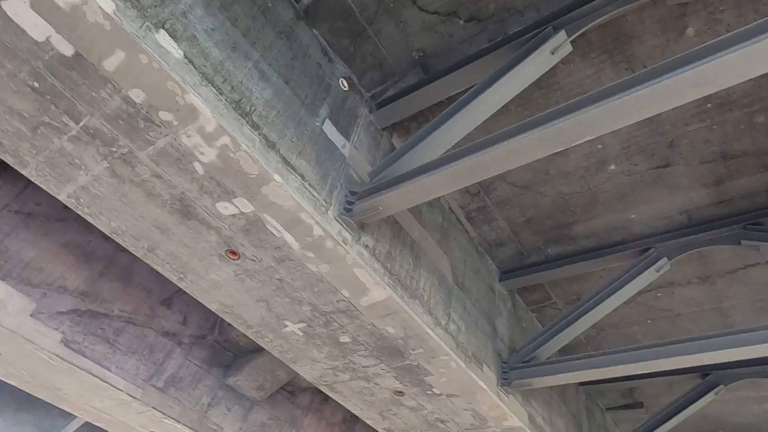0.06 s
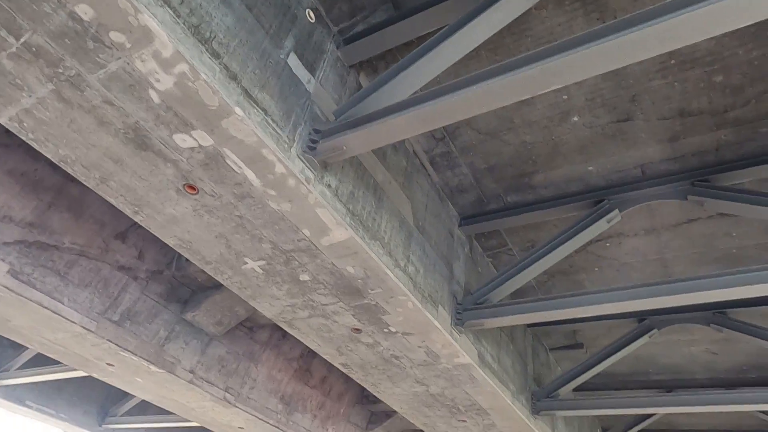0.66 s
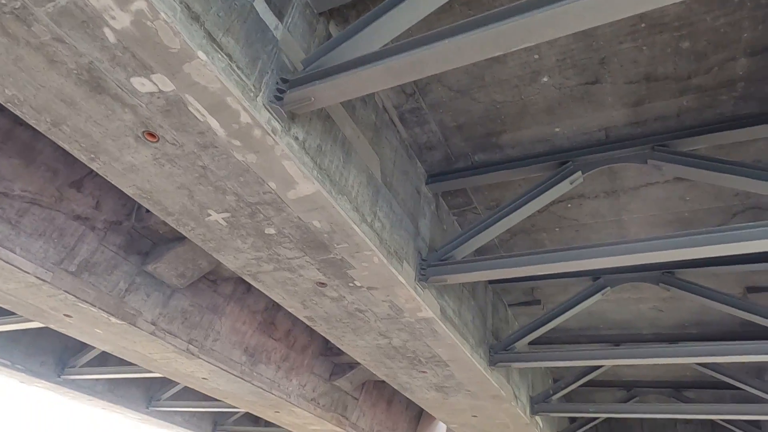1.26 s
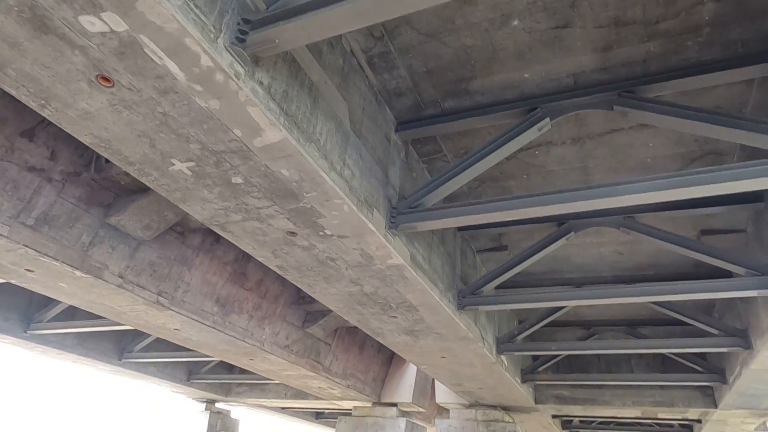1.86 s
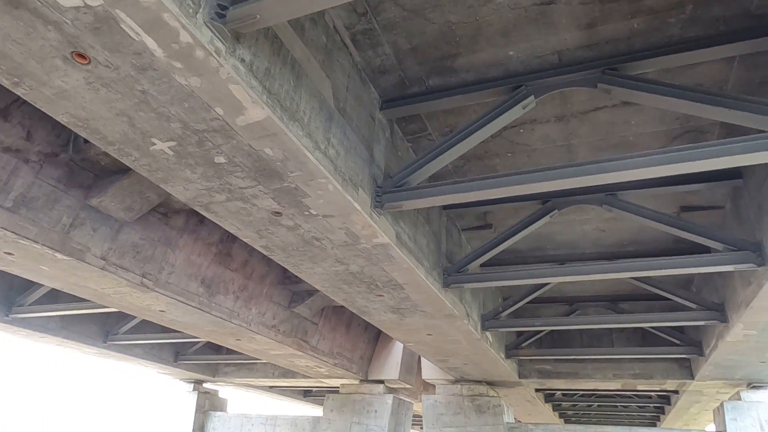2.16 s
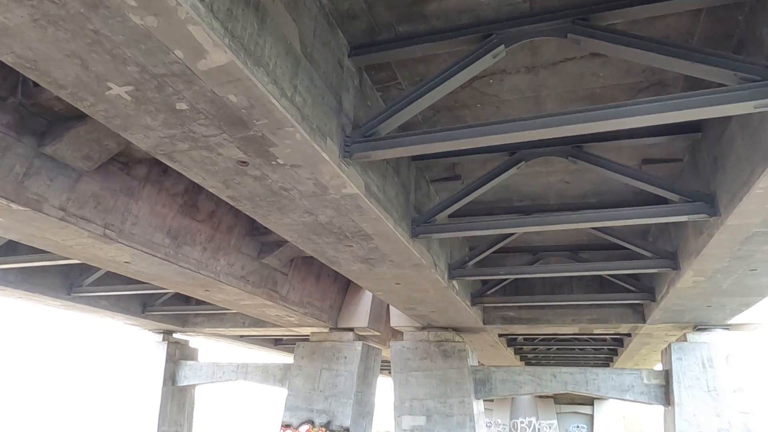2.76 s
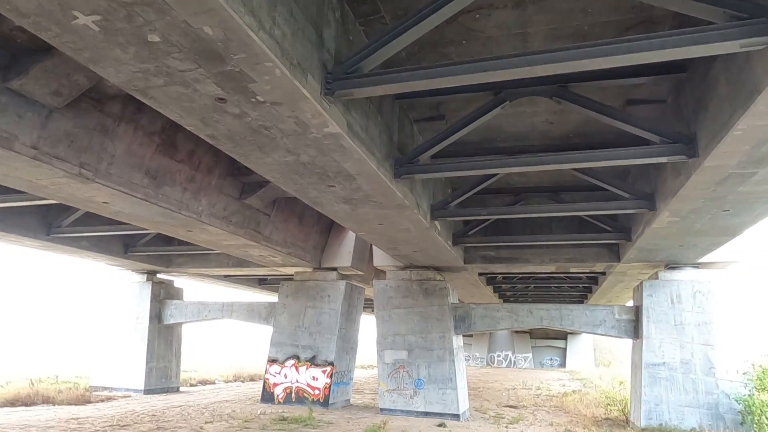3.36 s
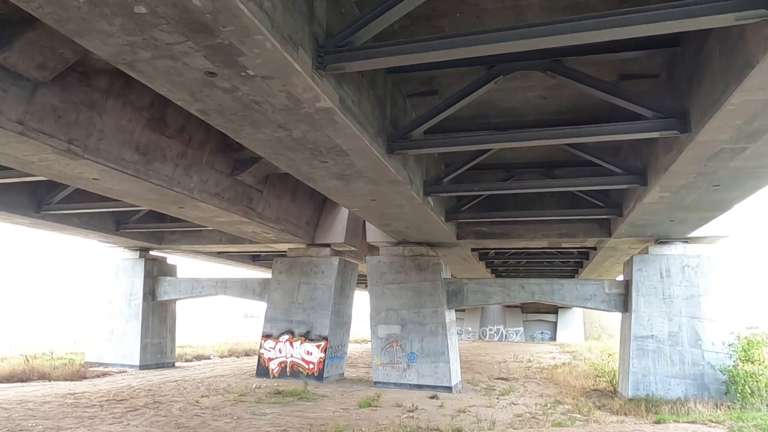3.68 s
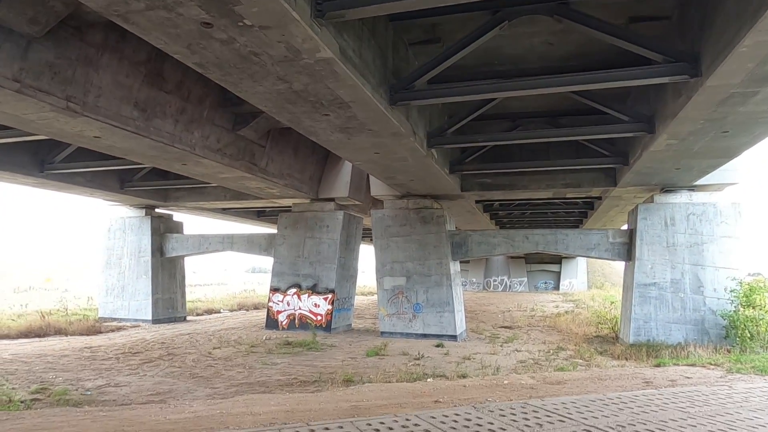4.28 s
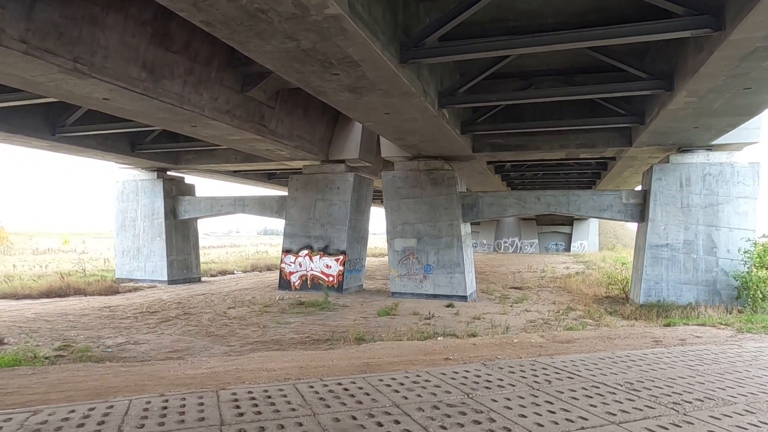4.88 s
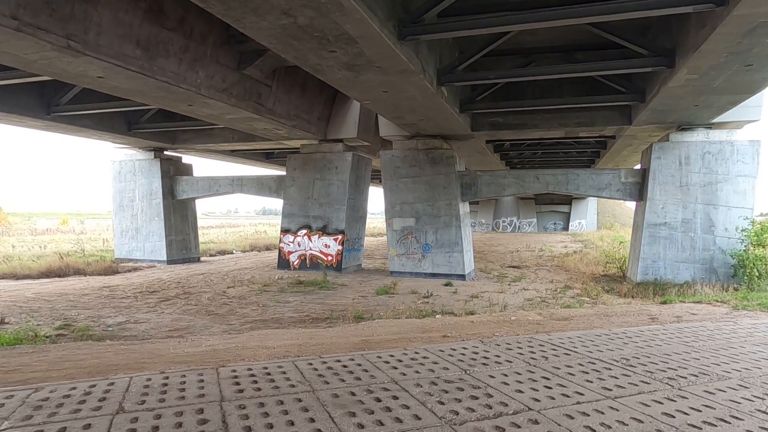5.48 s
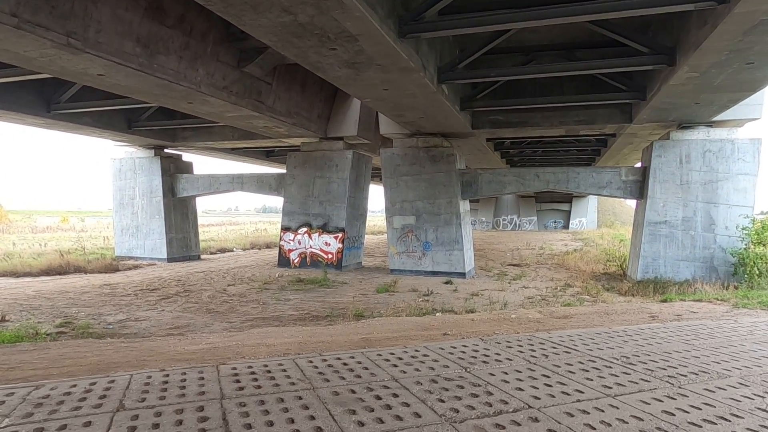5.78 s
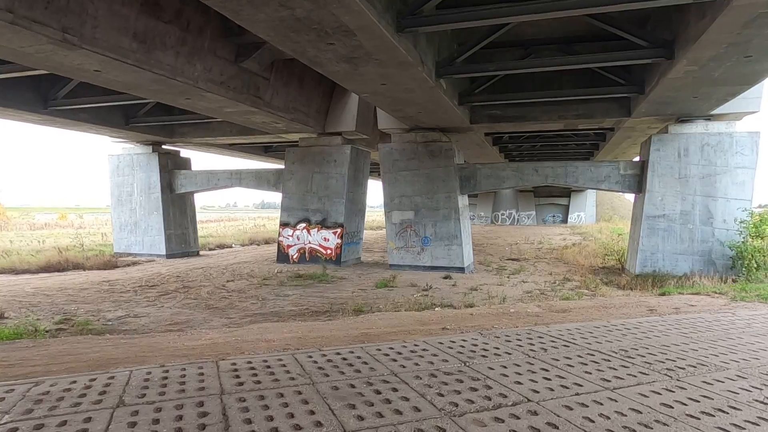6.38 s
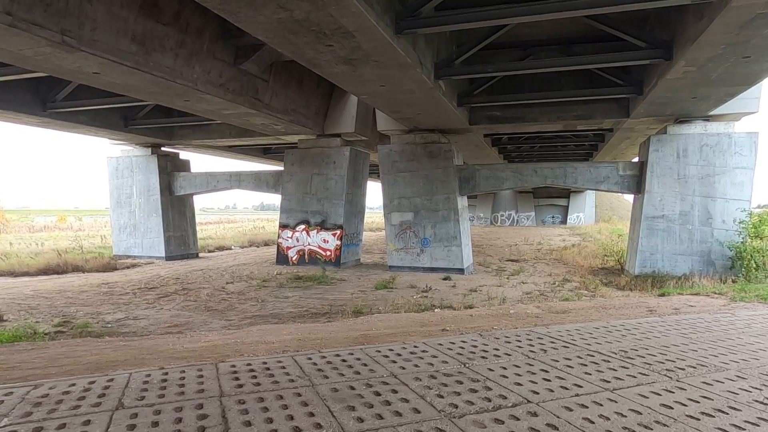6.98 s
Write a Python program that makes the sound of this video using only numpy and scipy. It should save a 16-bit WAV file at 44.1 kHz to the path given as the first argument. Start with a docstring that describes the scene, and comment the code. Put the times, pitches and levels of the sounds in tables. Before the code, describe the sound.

A low, continuous traffic rumble comes through a road bridge to a microphone at ground level below. An engine hum drops a little as it passes, then the tyre roar of a heavy vehicle starts to build. Two runs of deep, ringing thumps follow as axles cross the joints, with low drones between them. The tyres hum and keep getting louder and brighter, topped by faint hiss and tiny ticks.

```python
"""Under a concrete and steel road bridge. Far traffic hushes; wheels keep the deck ringing.
An engine tone sinks by Doppler shift and low drones swell out of the rumble. A heavy vehicle nears:
axles thump over joints, the span booms, the treads hum, the tyre roar grows louder and brighter.
A thin hiss surges above it, with a few faint high ticks."""
import sys
import numpy as np
from scipy import signal
from scipy.fft import rfft, irfft, next_fast_len
from scipy.io import wavfile
from scipy.ndimage import uniform_filter1d

SR = 44100
rng = np.random.default_rng(int(sys.argv[2]) if len(sys.argv) > 2 else 0)


def unload_audio(sound):
    """Save the sound as a 16-bit wav file, at the path given as the first command line argument."""
    columns = np.transpose(np.atleast_2d(sound))
    # keep every value between -1 and 1, then stretch to whole-number steps
    steps = np.round(np.clip(columns, -1, 1) * 32767)
    wavfile.write(sys.argv[1], SR, steps.astype(np.int16))


N = 314874
TIME = np.arange(N) / SR
FREQS = np.fft.rfftfreq(N, 1 / SR)
ON_SPAN_S = 4.02  # vehicle rolls onto this span

# bending of the whole span: f/Hz, width/Hz, level/dB
SPAN_MODES = [(22.86, 1.6, 2), (36.7, 9.8, 0.5), (45, 11, -5)]
# slab between the girders: f/Hz, width/Hz, level/dB
SLAB_MODES = [(56, 2.6, -4), (63.5, 5.5, 2), (72.6, 8.1, -1), (91.7, 6.2, -2)]
# girders: f/Hz, width/Hz, level/dB
GIRDER_MODES = [(107.5, 9.5, -6.5), (119.8, 3.5, -1.5), (128.2, 5, 2.5), (146.9, 6.2, -1), (160.3, 6, -3)]


def gain_of(db):
    """Decibels to amplitude."""
    return 10 ** (np.asarray(db) / 20)


def unit_rms(x):
    """Scale to rms 1."""
    return x / np.sqrt(np.mean(x ** 2) + 1e-20)


def spectrum_db(points, hz):
    """Spectrum table interpolated over log frequency."""
    f, db = np.transpose(points)
    return np.interp(np.log(hz + 1), np.log(f + 1), db)


def add(mix, start_s, sound):
    """Mix a sound in at start_s."""
    part = mix[round(start_s * SR):][:len(sound)]
    part += sound[:len(part)]


def envelope(start_s, length_s, rise_s, fade_s):
    """Linear rise; exponential fade from length_s after the start."""
    age = TIME - start_s
    return np.clip(age / rise_s, 0, 1) * np.exp(-np.maximum(age - length_s, 0) / fade_s)


def ringing(modes):
    """Noise in steep-skirted resonances, rms 1."""
    size = next_fast_len(N)
    freqs = np.fft.rfftfreq(size, 1 / SR)
    power = sum(gain_of(db) ** 2 / (1 + ((freqs - hz) / width) ** 2) ** 2 for hz, width, db in modes)
    return unit_rms(irfft(rfft(rng.standard_normal(size)) * np.sqrt(power), size)[:N])


def steadied(x, share, samples):
    """Even out a share of the slow swells, as many wheels at once do; rms 1."""
    power = abs(uniform_filter1d(x ** 2, samples)) + 1e-9
    return unit_rms(x / uniform_filter1d(power, samples // 2) ** (share / 2))


def rush(spectrum, patchy_db, ripple_db, dull_db=0):
    """Tyre noise, rms 1: drifting patches, ripple from reflections, distance loss of dull_db at 4 kHz."""
    frames, hz = N // 256 + 5, np.fft.rfftfreq(1024, 1 / SR)
    real, imag, patches = rng.standard_normal((3, frames, len(hz)))
    patches = unit_rms(uniform_filter1d(uniform_filter1d(patches, size=16, axis=0), size=6, axis=1))
    frame_dull_db = np.interp(np.arange(frames) * 256 / SR, TIME, np.broadcast_to(dull_db, N))
    loss_shape = np.log1p((hz / 900) ** 2) / np.log1p((4000 / 900) ** 2)
    field_db = spectrum_db(spectrum, hz) + patchy_db * patches - frame_dull_db[:, None] * loss_shape
    noise = signal.istft(((real + 1j * imag) * gain_of(field_db)).T, nperseg=1024, noverlap=768)[1][:N]
    ripple = unit_rms(uniform_filter1d(rng.standard_normal(len(FREQS)), size=100))
    return unit_rms(irfft(rfft(noise) * gain_of(ripple_db * ripple), N))


def far_traffic():
    """Even hush of the road beyond the span."""
    # far traffic and still air: f/Hz, relative density/dB
    spectrum = [(100, -28.5), (250, 0.5), (330, -2.5), (430, -3), (600, -0.5), (750, -1.5), (900, -2),
                (1070, -1.5), (1400, -5.5), (2000, -13), (2700, -22.5), (3500, -32), (4300, -38.5),
                (6000, -41), (8800, -46.5)]
    return gain_of(-48) * rush(spectrum, patchy_db=0.97, ripple_db=1.0)


def jolting(heaves, hollow, fade_s):
    """Envelope of wheels jolting over rough deck, weighted for span (heaves) or bays (hollow)."""
    # rough stretches: t/s, length/s, level/dB, span offset/dB, bay offset/dB
    jolts = [(0.035, 1.07, -21.5, 14.5, -6), (0.623, 0.22, -10, -9.5, -11), (1.978, 0.23, -11, 0, -10),
             (2.937, 0.27, -10.5, 4.5, -5), (3.985, 0.09, -9, 3, -2), (4.16, 0.43, -7, 4, 7.5),
             (4.418, 0.44, -7.5, 4, 7), (5.09, 0.16, -10, 9, 0), (6.18, 1.1, -4.5, -3, 5.5)]
    power = np.zeros(N)
    for start_s, length_s, db, span_db, bay_db in jolts:
        strength = gain_of(db + heaves * span_db + hollow * bay_db)
        power += (strength * envelope(start_s, length_s, rise_s=0.035, fade_s=fade_s)) ** 2
    return np.sqrt(power)


def shaking(idle_db, load_db, jolt_db, fade_s, build_db_per_s, heaves=False, hollow=False):
    """Drive on one bridge part: power sum of other traffic, vehicle load and jolts."""
    roll_on_s, joint_loss_db = 1, 3.5
    before_s = np.maximum(ON_SPAN_S - TIME, 0)
    off_span = 1 - np.clip((TIME - ON_SPAN_S) / roll_on_s, 0, 1)
    load = gain_of(load_db - build_db_per_s * before_s - joint_loss_db * off_span)
    jolts = gain_of(jolt_db) * jolting(heaves, hollow, fade_s)
    return np.sqrt(gain_of(idle_db) ** 2 + load ** 2 + jolts ** 2)


def deck():
    """Rolling wheels keep span, slab, girders, bays and braces ringing."""
    # air in the bays between girders: f/Hz, width/Hz, level/dB
    bay_modes = [(180, 11, 2), (207.8, 8.3, 2), (230.2, 7.7, -1), (248.6, 10, -5), (278.3, 29, -10.5),
                 (334, 45, -14)]
    # steel cross braces: f/Hz, width/Hz, level/dB
    brace_modes = [(268.3, 4.7, -0.5), (358.5, 5.2, -4)]
    span = shaking(idle_db=-46, load_db=-38.5, jolt_db=-36, fade_s=0.21, build_db_per_s=17.5, heaves=True)
    slab = shaking(idle_db=-44.5, load_db=-43, jolt_db=-34, fade_s=0.079, build_db_per_s=4.5)
    girders = shaking(idle_db=-46.5, load_db=-36.5, jolt_db=-34, fade_s=0.055, build_db_per_s=9)
    bays = shaking(idle_db=-55, load_db=-38, jolt_db=-40.5, fade_s=0.054, build_db_per_s=5, hollow=True)
    braces = shaking(idle_db=-62, load_db=-52.5, jolt_db=-61, fade_s=0.15, build_db_per_s=6)
    return (span * steadied(ringing(SPAN_MODES), share=0.79, samples=8000)
            + slab * steadied(ringing(SLAB_MODES), share=0.57, samples=6000)
            + girders * steadied(ringing(GIRDER_MODES), share=0.62, samples=5000)
            + bays * steadied(ringing(bay_modes), share=0.11, samples=5000)
            + braces * steadied(ringing(brace_modes), share=0.2, samples=16000))


def engine(firing_hz=68.03, doppler_share=0.04, pass_s=2.95, glide_s=0.36):
    """Firing tone: Doppler fall on passing, wavering as its paths through the deck shift."""
    # swells and dips: t/s, half width/s, gain/dB
    swells = [(2.03, 0.29, 5), (2.48, 0.084, -10), (3.68, 0.18, 6.5)]
    recede_db_per_s, drift_hz, waver_depth, stray_rad = 0.2, 6, 0.33, 0.4
    hz = firing_hz * (1 - doppler_share * np.tanh((TIME - pass_s) / glide_s))
    db = -43.5 - recede_db_per_s * np.maximum(TIME - pass_s, 0)
    db += sum(swell_db * np.exp(-((TIME - at_s) / width_s) ** 2) for at_s, width_s, swell_db in swells)
    waver, stray = (ringing([(0.0056, drift_hz, 0)]) for _ in range(2))
    tone = np.sin(2 * np.pi * np.cumsum(hz) / SR + stray_rad * stray)
    return gain_of(db) * unit_rms((1 + waver_depth * waver) * tone)


def crackle(spectrum, rate_per_s=500, spread_db=4.5):
    """Sparse uneven grains coloured by a spectrum, rms 1."""
    grains = (rng.random(N) < rate_per_s / SR) * rng.choice([-1, 1], N)
    sizes = gain_of(spread_db * np.minimum(rng.exponential(1, N), 4))
    return unit_rms(irfft(rfft(grains * sizes) * gain_of(spectrum_db(spectrum, FREQS)), N))


def tyres(earshot_s=2.44, rise_s=0.15, near_s=7.094, swell_db_per_s=3.5, brighten_db_per_s=4):
    """Roar swells and brightens on approach, flaring at the span; grainy hiss surges above it."""
    # tyre roar: f/Hz, relative density/dB
    roar_spectrum = [(150, -10), (310, -9), (410, -5), (500, 0.5), (575, 1), (700, -3.5), (930, -5),
                     (1200, -9), (2000, -19.3), (3000, -28.5), (4500, -38.5), (6000, -50), (7500, -57),
                     (8600, -57)]
    # thin hiss: f/Hz, relative density/dB
    hiss_spectrum = [(1200, -13.5), (2500, 6.5), (3600, 1.5), (5000, -6), (6300, -12), (8800, -18.5)]
    # hiss surges: t/s, length/s, level/dB
    surges = [(1.6, 0.28, -77), (2.948, 0.16, -76.5), (3.313, 0.38, -67.5), (3.877, 0.33, -72.5),
              (4.692, 0.33, -69), (5.218, 0.24, -66), (6.205, .17, -66)]
    to_go_s = near_s - TIME
    level = gain_of(-35 - swell_db_per_s * to_go_s) * np.clip((TIME - earshot_s) / rise_s, 0, 1)
    level *= 1 + 0.25 * envelope(ON_SPAN_S, length_s=0.078, rise_s=0.078, fade_s=0.23)
    roar = level * rush(roar_spectrum, patchy_db=0, ripple_db=0.24, dull_db=brighten_db_per_s * to_go_s - 4)
    surge_power = sum((gain_of(db) * envelope(start_s, length_s, rise_s=0.13, fade_s=0.19)) ** 2
                      for start_s, length_s, db in surges)
    hiss_level = np.sqrt(surge_power + (gain_of(-40) * level) ** 2)
    hiss = rush(hiss_spectrum, patchy_db=1.0, ripple_db=2.8) + gain_of(-6) * crackle(hiss_spectrum)
    return roar + hiss_level * hiss


def drones(stray_rad=0.25, drift_hz=5):
    """Low, slightly unsteady notes swell out of the rumble and sink back."""
    # deck drones: t/s, length/s, f/Hz, level/dB
    notes = [(2.036, 0.21, 119.7, -39.5), (2.156, 0.19, 209, -46.5), (2.497, 0.6, 159, -49),
             (2.7, 1, 120.8, -46), (2.92, 0.38, 227.2, -50.5), (3.345, 0.36, 209.6, -44.5),
             (4.45, 0.32, 182.4, -38), (4.803, 0.14, 214.8, -41.5), (4.92, 0.24, 125.4, -38.5),
             (5.205, 0.32, 155.3, -41), (5.525, 0.29, 146.2, -37.5), (5.778, 0.66, 66.1, -40)]
    stray = stray_rad * ringing([(0.009, drift_hz, 0)])
    out = np.zeros(N)
    for start_s, length_s, hz, db in notes:
        tone = unit_rms(np.sin(2 * np.pi * (hz * TIME + rng.random()) + stray))
        out += gain_of(db) * envelope(start_s, length_s, rise_s=0.12, fade_s=0.12) * tone
    return out


def struck(modes, rise_s, damping_hz, scatter_turns=0.3):
    """A blow starts modes nearly in phase; each decays by its width plus tyre damping."""
    hz, width_hz, db = np.transpose(modes)[:, :, None]
    age = TIME[:SR]
    turns = hz * age + scatter_turns * rng.random(hz.shape)
    decay = np.exp(-np.pi * (width_hz + damping_hz) * age)
    ring = (gain_of(db) * decay * np.sin(2 * np.pi * turns)).sum(0)
    ring *= (1 - np.exp(-age / rise_s)) ** 2
    return ring / np.sqrt(np.mean(ring[:SR // 10] ** 2))  # rms 1 over the first 0.1 s


def joints(trim_db=-2):
    """Each axle drops on a joint: girders knock, slab thuds, span heaves."""
    # axle blows, relative levels: t/s, knock/dB, thud/dB, heave/dB
    axles = [(3.98, -32.5, -39.5, -36.5), (4.012, -37, -34.5, -36), (4.148, -28, -31, -28),
             (4.185, -35, -40, -39), (4.221, -30.5, -33.5, -27), (4.291, -32, -29, -35.5),
             (4.389, -31, -36, -49), (4.434, -43, -28, -38), (4.478, -30, -40, -40),
             (4.573, -41, -43, -33.5), (4.657, -40, -36, -27.5), (4.745, -28.5, -32, -39),
             (4.78, -44, -29, -31.5), (4.861, -41, -37, -32), (4.916, -46, -35, -36),
             (6.177, -29.5, -29.5, -30), (6.226, -40, -40, -46), (6.313, -31, -34, -24.5),
             (6.457, -27, -39, -38), (6.565, -31, -41, -29), (6.638, -27.5, -33, -39),
             (6.776, -28.5, -46, -38), (6.843, -30.5, -29, -48), (6.887, -31, -30, -46),
             (6.935, -30, -43, -46), (6.988, -33, -44, -43), (7.058, -36.5, -48, -43)]
    out = np.zeros(N)
    for start_s, knock_db, thud_db, heave_db in axles:
        add(out, start_s, gain_of(knock_db) * struck(GIRDER_MODES, rise_s=0.014, damping_hz=8.8))
        add(out, start_s, gain_of(thud_db) * struck(SLAB_MODES, rise_s=0.024, damping_hz=4.2))
        add(out, start_s, gain_of(heave_db) * struck(SPAN_MODES, rise_s=0.026, damping_hz=6))
    return gain_of(trim_db) * out


def ticks(tick_s=0.0014, tail_db=-10, tail_s=0.022, width_octaves=0.61):
    """Faint, sharp high ticks, each with a short fizzing tail."""
    # ticks: t/s, level/dB, f/Hz
    events = [(4.171, -76, 6500), (4.207, -64.5, 5700), (4.601, -76, 6500), (5.068, -71, 6500),
              (5.305, -70, 6000), (6.336, -66, 6000)]
    age, freqs = TIME[:SR], np.fft.rfftfreq(SR, 1 / SR)
    decay = np.exp(-age / tick_s) + gain_of(tail_db) * np.exp(-age / tail_s)
    out = np.zeros(N)
    for start_s, db, hz in events:
        colour = np.exp(-0.5 * (np.log2((freqs + 1) / hz) / width_octaves) ** 2)
        fizz = unit_rms(irfft(rfft(rng.standard_normal(SR)) * colour, SR))
        add(out, start_s, gain_of(db) * fizz * decay)
    return out


def tread_hum(width_hz=24):
    """Narrow-band tread hum, its pitch set by each patch of road."""
    # road patches: t/s, length/s, f/Hz, level/dB
    patches = [(4.22, 0.23, 588, -48), (4.585, 0.28, 580, -46.5), (5.08, 0.15, 562, -46.5),
               (5.308, 0.17, 498, -45), (5.662, 0.18, 580, -40.5), (5.89, 0.19, 520, -45.5),
               (6.32, 0.11, 470, -44), (6.47, 0.13, 590, -43.5), (6.65, 0.12, 538, -41.5),
               (7.02, 0.14, 550, -40)]
    out = np.zeros(N)
    for start_s, length_s, hz, db in patches:
        band = steadied(ringing([(hz, width_hz, 0)]), share=1.0, samples=4000)
        out += gain_of(db) * envelope(start_s, length_s, rise_s=0.085, fade_s=0.079) * band
    return out


def scene():
    """Mono mix at ground level below the span."""
    return (far_traffic() + tyres() + tread_hum() + engine() + deck() + joints() + drones() + ticks())[None]


def record(dry, low_hz=14, high_hz=9100):
    """Microphone low cut, then band limit."""
    low_cut = signal.butter(3, low_hz, "highpass", fs=SR, output="sos")
    high_cut = signal.firwin(255, high_hz, window=("kaiser", 9), fs=SR)
    return signal.oaconvolve(signal.sosfilt(low_cut, dry), high_cut[None], "same")


dry = scene()
out = record(dry)
unload_audio(out)
```